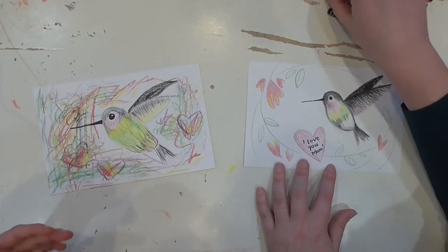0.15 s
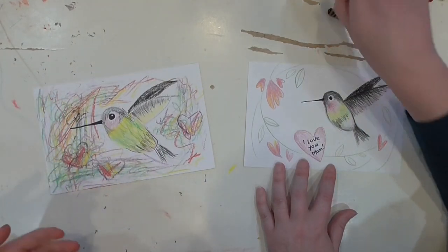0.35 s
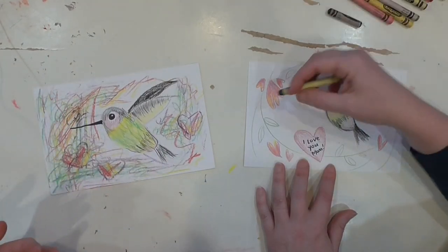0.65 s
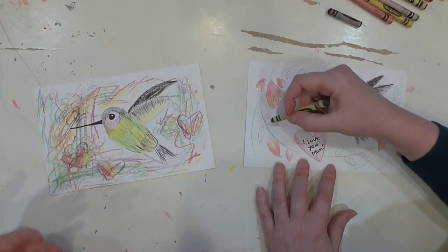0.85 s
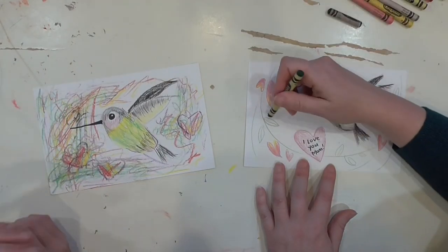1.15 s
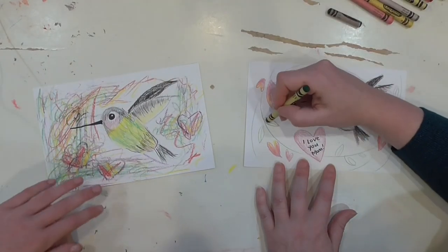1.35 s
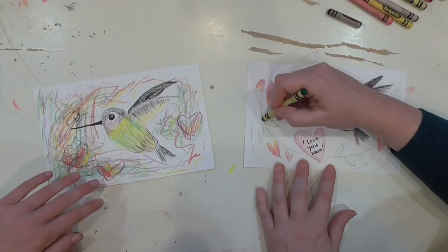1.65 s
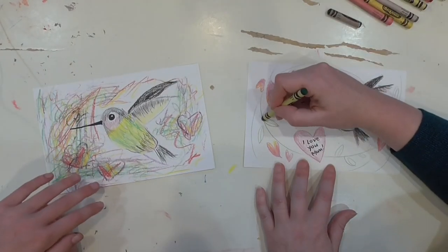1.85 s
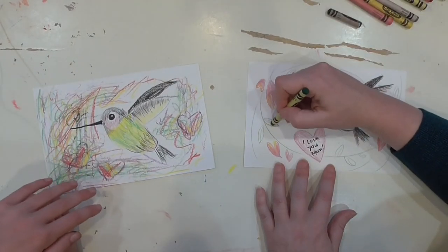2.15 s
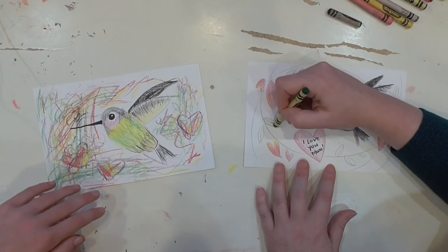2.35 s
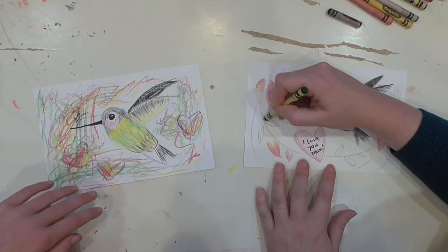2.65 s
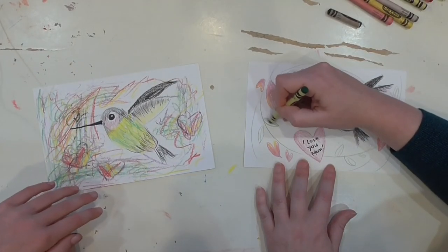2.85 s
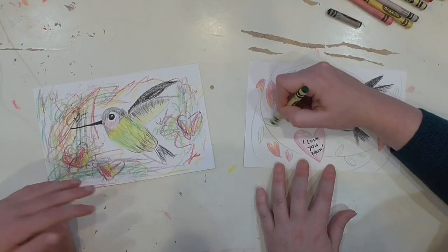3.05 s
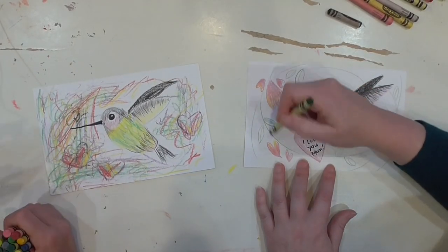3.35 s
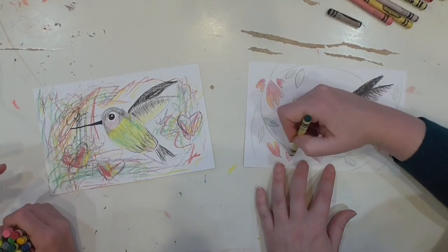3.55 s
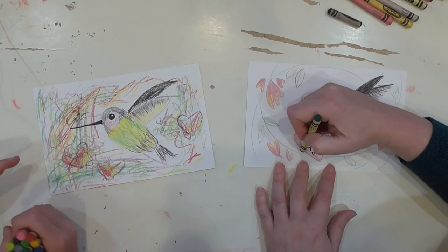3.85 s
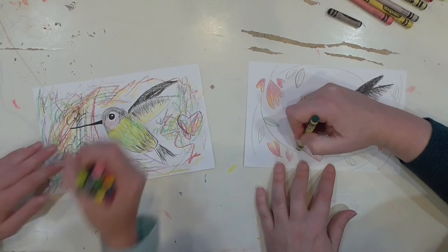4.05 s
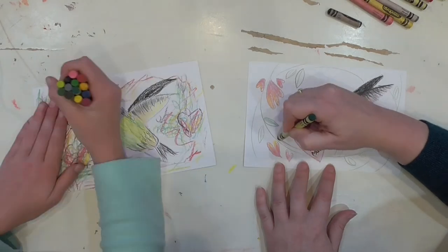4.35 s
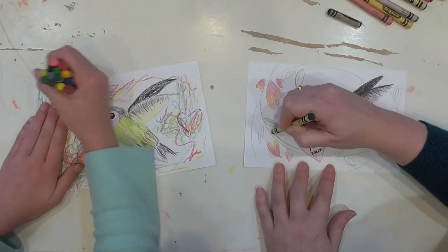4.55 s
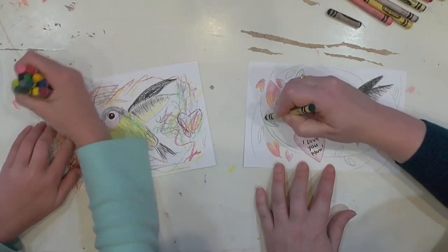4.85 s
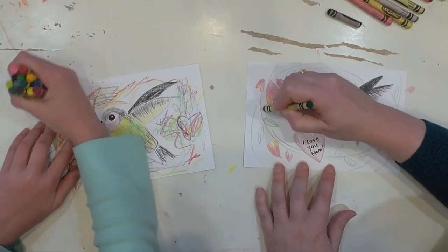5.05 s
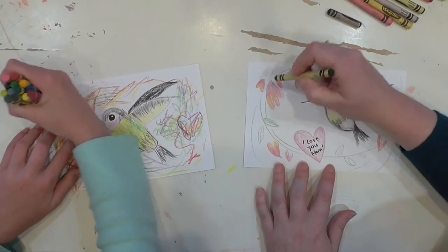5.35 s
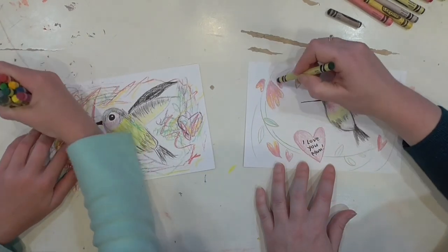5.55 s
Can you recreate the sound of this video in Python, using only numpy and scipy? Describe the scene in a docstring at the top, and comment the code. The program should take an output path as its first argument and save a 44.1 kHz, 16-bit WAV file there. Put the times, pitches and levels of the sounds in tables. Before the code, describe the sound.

Soft skin and cloth brushing over paper opens the scene, with the tail of a knock. At about one and a half seconds crayons clatter on the table top. A fast, gentle back-and-forth crayon hiss follows, then near silence. Finally a bunch of crayons hits the table and drags roughly, with low bumps and knocks. Near microphones, short room reverberation, faint background air.

```python
"""In a small room, two people draw with wax crayons on paper lying on a table.
One shades lightly back and forth; the other knocks crayons on the table, then drags a fistful over the sheet.
Stick-slip of wax on the paper's tooth is made from trains of tiny impulses, coloured as hiss.
Blows and judder excite the modes of the table top, and hands and sleeves brush softly.
Beneath lie the quiet air of the room and a brief, faint hum."""
import sys
import numpy as np
from scipy import signal
from scipy.fft import rfft, irfft, next_fast_len
from scipy.io import wavfile

SR = 44100
rng = np.random.default_rng(int(sys.argv[2]) if len(sys.argv) > 2 else 0)


def persist_wave(psi):
    """Save psi, clipped to +-1, as 16-bit WAV."""
    counts = np.round(np.clip(psi, -1, 1) * 32767).astype(np.int16)
    wavfile.write(sys.argv[1], SR, np.atleast_2d(counts).T)


N = 250929
TIME = np.arange(N) / SR   # whole scene [s]
BLOW = TIME[:SR // 2]   # time after one blow [s]


def from_db(db):
    """Level is logarithmic: 20 dB is a factor of ten in amplitude."""
    return 10 ** (np.asarray(db) / 20)


def rms_one(x):
    """Effective value: scale a signal to unit root mean square."""
    return x / np.sqrt(np.mean(x ** 2) + 1e-20)


def at_hz(points, hz, axis=1):
    """Logarithmic pitch: interpolate a column of a table on a log-frequency axis."""
    points = np.array(points)
    return np.interp(np.log(hz + 0.00079), np.log(points[:, 0]), points[:, axis])


def cut(x, hz, kind, order=2):
    """Maximally flat (Butterworth) low- or high-pass."""
    corner_hz = min(hz, SR / 2 - 2000)
    return signal.sosfilt(signal.butter(order, corner_hz, kind, fs=SR, output="sos"), x)


def resonate(x, hz, width_hz):
    """Damped resonance: a pole pair whose bandwidth sets its decay, with gain 1 on top."""
    r = np.exp(-np.pi * width_hz / SR)
    zeros = np.array([1, 0, -1]) * (1 - r * r) / 2
    poles = [1, -2 * r * np.cos(2 * np.pi * hz / SR), r * r]
    return signal.lfilter(zeros, poles, x + 1e-18)


def disperse(x, hz, width_hz):
    """Dispersion of bending waves: an allpass delays the band around hz most."""
    return x - 2 * resonate(x, hz, width_hz)


def colour(x, spectrum):
    """Spectral shaping: weight a noise by frequency and bring it to rms 1."""
    size = next_fast_len(x.shape[-1])
    hz = np.arange(size // 2 + 1) * SR / size
    shaped = irfft(rfft(x, size) * from_db(at_hz(spectrum, hz)), size)
    return rms_one(shaped[..., :x.shape[-1]])


def stereo(pair):
    """Spatial coherence: two unrelated signals become left and right, alike in the bass, apart in the treble."""
    # (frequency [Hz], left-right correlation [-1 to 1])
    likeness = [(120, 0.88), (300, 0.65), (600, 0.62), (1500, 0.45), (5000, 0.71), (9000, 0.35),
                (12000, 0.12)]
    size = next_fast_len(pair.shape[-1])
    alike = np.clip(at_hz(likeness, np.arange(size // 2 + 1) * SR / size), -1, 1)
    weighted = rfft(pair, size) * np.sqrt([1 + alike, 1 - alike])
    mid, side = irfft(weighted, size)[:, :pair.shape[-1]]
    return np.array([mid + side, mid - side])


def add(out, s, sound):
    """Superposition: mix a stereo sound in at time s."""
    at = round(s * SR)
    lo, hi = max(at, 0), min(at + sound.shape[-1], N)
    out[:, lo:hi] += sound[:, lo - at:hi - at]


def arch(middle_s, length_s, shape):
    """Speed of a movement from rest to rest: a half cosine, flatter on top for a low shape."""
    phase = np.clip((TIME - middle_s) / length_s, -.5, .5)
    return np.maximum(1e-12, np.cos(np.pi * phase)) ** shape


def slips(per_s, spread_db, clump_db, clump_rate=45):
    """Stick-slip friction: two random trains of tiny releases, in clumps as the grip changes."""
    sizes = from_db(spread_db * np.minimum(rng.exponential(1, (2, N)), 5))
    grip_db = clump_db * np.interp(TIME * clump_rate, np.arange(N), rng.standard_normal(N))
    signs = rng.choice([-1, 1], (2, N))
    released = rng.random((2, N)) < per_s / SR
    return rms_one(from_db(grip_db) * sizes * signs * released)


def table(force):
    """Modal superposition: one force drives all modes of the table top together."""
    # modes of the table top: (frequency [Hz], bandwidth [Hz], level [dB])
    mode_table = [(139.5, 21, 8), (199.5, 14, 3.5), (303.7, 68, -0.5), (419, 56, -3), (454.7, 30, -2.5),
                  (504, 37, 1), (567.7, 33, -4), (680, 50, 4), (739, 14, 0), (769, 48, 2), (848, 13, -4.5),
                  (979, 79, -0.5), (1096, 11, -1.5), (1193, 49, -1), (1307, 99, -9), (1435, 25, -2),
                  (1471, 17, -2.5), (1900, 130, -11), (2250, 280, -7.5), (2500, 9.7, -9), (2795, 61, -7),
                  (3170, 470, 0.5), (3622, 40, -28.5), (4260, 250, -15.5)]
    return sum(from_db(db) * resonate(force, hz, width) for hz, width, db in mode_table)


def contact(scatter_db, scatter_t60):
    """Impulse and reflection: one push, then bending waves scattered back from the table's edges."""
    decay = from_db(-60 * BLOW / scatter_t60)
    waves = rms_one(rng.standard_normal((2, len(BLOW))) * decay * (BLOW > .003))
    force = from_db(scatter_db) * waves / np.sqrt(len(BLOW))
    force[0, 0] += 1
    return stereo(force)


def at_level(sound, db, span_s):
    """Energy of a transient: scale a blow to the energy of db held for span_s."""
    return from_db(db) * rms_one(sound) * np.sqrt(span_s / BLOW[-1])


def room_echo():
    """Diffuse reverberation: noise builds up after the direct sound and dies band by band."""
    # reverberation: (frequency [Hz], level [dB], 60 dB decay time [s])
    echo_table = [(120, -22, 0.12), (292, -0.5, 0.38), (694, -4, 0.5), (1500, -2, 0.4), (3334, -4, 0.44),
                  (6030, -7.5, 0.33), (12000, -20.5, .22)]
    edges, out = np.geomspace(60, 16000, 13), 0
    build_up = 1 - np.exp(-(BLOW / 0.0016) ** 2)
    for low, high in zip(edges, edges[1:]):
        hz = np.sqrt(low * high)
        band_pass = signal.butter(2, [low, high], "band", fs=SR, output="sos")
        band = signal.sosfilt(band_pass, stereo(rng.standard_normal((2, len(BLOW)))))
        tail = band * from_db(-60 * BLOW / at_hz(echo_table, hz, axis=2)) * build_up
        bandwidth_gain = np.sqrt(2 * (high - low) / SR / len(BLOW))
        out = out + from_db(at_hz(echo_table, hz)) * rms_one(tail) * bandwidth_gain
    return out


def in_room(sound, wet_db=0):
    """Convolution with the room response: direct sound plus its reverberation."""
    echo = signal.fftconvolve(sound, room_echo(), axes=-1)[:, :sound.shape[-1]]
    return sound + from_db(wet_db) * echo


def crack(db, low_hz, high_hz, t60):
    """Exponential decay: a bright burst of noise that dies away."""
    # burst spectrum: (frequency [Hz], level [dB])
    click_spectrum = [(1500, 15.5), (3300, 1), (4500, 0), (6000, -11.5), (8000, -1), (10000, -0.5),
                      (12500, -10), (16000, -19)]
    noise = colour(rng.standard_normal((2, len(BLOW))), click_spectrum)
    burst = stereo(noise) * from_db(-60 * BLOW / t60)
    burst = cut(cut(burst, low_hz, "high", order=3), high_hz, "low", order=4)
    return at_level(burst, db, 0.0068)


def air():
    """Stationary background noise: the quiet air of the room."""
    # air spectrum: (frequency [Hz], level [dB])
    air_spectrum = [(25, -18), (70, -16.5), (130, -1), (230, -6), (500, -11.5), (1300, -12.5), (1800, -21),
                    (3300, -26.5), (6200, -26.5), (9500, -17.5), (12000, -18.5), (16000, -24.5)]
    return from_db(-63) * colour(stereo(rng.standard_normal((2, N))), air_spectrum)


def hum():
    """Narrow-band noise: two equal resonances in a row make a faint hum that comes and goes."""
    hz, width_hz = 232, 14   # width of each resonance
    level = from_db(-67) * arch(middle_s=4.07, length_s=0.91, shape=0.85)
    tone = resonate(rng.standard_normal(N), hz, width_hz)
    return level * rms_one(resonate(tone, hz, width_hz))


def brushing():
    """Sliding friction of skin and cloth: level follows speed, as a hiss of paper and a murmur of the table."""
    # slides of hand and sleeve: (middle [s], length [s], paper hiss [dB], table murmur [dB])
    slides = [(0.073, 0.84, -64, -68), (0.694, 0.68, -62, -65), (1.1, 0.4, -63.5, -64),
              (2.196, 0.2, -62.5, -58.5), (3.104, 0.92, -69, -66.5), (3.85, .26, -65.5, -69),
              (3.963, 0.15, -84, -62.5), (4.271, 0.46, -64, -65), (4.374, 0.11, -63, -67)]
    # hiss spectrum: (frequency [Hz], level [dB])
    paper_spectrum = [(1200, -39), (2300, -6.5), (3000, -9.5), (4700, -5), (6100, -13), (8400, 0),
                      (11000, -0.5), (14000, -9), (16000, -28)]
    # murmur spectrum: (frequency [Hz], level [dB])
    murmur_spectrum = [(40, -31), (80, -14.5), (200, -4), (380, -5.5), (600, -13), (1050, -9.5),
                       (2300, -17.5), (3500, -46)]
    hiss, murmur = 0, 0
    for s, length, hiss_db, murmur_db in slides:
        speed = arch(s, length, shape=0.87)
        hiss = hiss + from_db(hiss_db) * speed
        murmur = murmur + from_db(murmur_db) * speed
    paper = colour(stereo(slips(per_s=11000, spread_db=3, clump_db=1.2)), paper_spectrum)
    rub = colour(stereo(slips(per_s=2800, spread_db=-4.5, clump_db=0.9)), murmur_spectrum)
    return hiss * paper + murmur * rub


def shading():
    """Friction-driven resonance: slips of the tip hiss in each stroke and set crayon and sheet ringing."""
    # back-and-forth strokes: (middle [s], level [dB])
    strokes = [(1.821, -58), (1.901, -60), (2.011, -54), (2.1, -53.5), (2.2, -55), (2.305, -56),
               (2.402, -55.5), (2.515, -52), (2.616, -52), (2.733, -55.5), (2.838, -54), (2.956, -52),
               (3.038, -53.5), (3.164, -54), (3.24, -60.5)]
    # friction spectrum: (frequency [Hz], level [dB])
    friction_spectrum = [(60, -26), (150, 8), (400, 3.5), (850, -5.5), (1400, -12.5), (3000, -14.5),
                         (6200, -13.5), (8500, -2.5), (11000, -7), (13500, -9), (16000, -20.5)]
    # narrow resonances of crayon and sheet under the tip: (frequency [Hz], bandwidth [Hz], level [dB])
    tip_modes = [(1119, 81, 17), (1443, 47, 19), (2000, 84, 14.5), (11310, 300, 12.5)]
    speed = sum(from_db(db) * arch(s, length_s=0.085, shape=1.24) for s, db in strokes)
    grains = slips(per_s=12000, spread_db=2.8, clump_db=1.2)
    friction = colour(stereo(grains), friction_spectrum)
    rings = sum(from_db(db) * resonate(friction, hz, width) for hz, width, db in tip_modes)
    return speed * rms_one(friction + rings)


def ticks():
    """Transients of stiff and limp bodies: wax clicks for milliseconds; the sheet rustles a little longer."""
    # dry clicks of wax: (time [s], level [dB], lowest frequency [Hz])
    click_table = [(0.201, -59.5, 1000), (.943, -60, 4000), (1.301, -57.5, 6900), (1.4138, -48.5, 2500),
                   (1.4307, -26, 2290), (2.518, -39.5, 3000), (3.49, -67, 5100), (3.923, -61, 3000),
                   (4.4719, -38.5, 4950), (5.01, -57, 5230), (5.421, -44.5, 1480), (5.618, -30.5, 1340)]
    # short rustles of the sheet: (time [s], level [dB])
    rustle_table = [(.484, -53.5), (.533, -53.5), (.825, -56), (1.075, -60), (2.822, -49)]
    out = np.zeros((2, N))
    for s, db, low_hz in click_table:
        add(out, s, crack(db, low_hz, high_hz=5.54 * low_hz, t60=0.015))
    for s, db in rustle_table:
        add(out, s, crack(db, low_hz=7070, high_hz=13400, t60=0.14))
    return in_room(out, wet_db=2.0)


def bumps():
    """Soft contact: yielding flesh moves only the lowest modes."""
    # bumps of hands and fist: (time [s], level [dB], centre frequency [Hz])
    bump_table = [(.2, -40, 216), (0.33, -58, 230), (1.164, -63, 150), (1.713, -64, 152),
                  (1.783, -59.5, 92), (4.254, -63, 251), (4.371, -54, 210), (4.405, -61, 285),
                  (4.708, -45.5, 115), (4.863, -42.5, 103), (5.108, -35, 140), (5.34, -38, 114),
                  (5.581, -36.5, 122)]
    spread = 1.7   # a bump reaches this factor below and above its centre
    out = np.zeros((2, N))
    for s, db, hz in bump_table:
        force = contact(scatter_db=-6.5, scatter_t60=0.31)
        sound = table(force) + from_db(1.5) * resonate(force, 135, 110)
        sound = cut(sound, hz / spread, "high", order=4)
        sound = cut(sound, hz * spread, "low", order=3)
        add(out, s, in_room(at_level(disperse(sound, 150, 230), db, 0.056)))
    return out


def knocks():
    """Contact hardness: a short push at the spot, then ringing modes; harder contacts reach higher."""
    # crayons on the table: (time [s], level [dB], lowest frequency [Hz],
    # highest frequency set by contact hardness [Hz], frequency favoured at that spot [Hz])
    knock_table = [(-.07, -31.5, 345, 1900, 748), (.203, -52, 550, 1930, 775),
                   (1.415, -25.5, 420, 2000, 670), (1.4291, -24.5, 400, 4200, 1180),
                   (1.437, -24.5, 450, 1700, 1220), (1.446, -26, 300, 1000, 527),
                   (2.519, -26.5, 273, 2640, 1175), (4.033, -50.5, 80, 1146, 150),
                   (4.4742, -21.5, 125, 2250, 186), (4.712, -39.5, 152, 990, 700),
                   (4.749, -41, 250, 930, 493), (4.9813, -39, 397, 1400, 810),
                   (5.2639, -34.5, 222, 1130, 490), (5.311, -40, 347, 1070, 725),
                   (5.4186, -28, 410, 1240, 735), (5.6161, -19, 215, 1424, 765),
                   (5.644, -39, 180, 2620, 1070)]
    out = np.zeros((2, N))
    for s, db, low_hz, high_hz, spot_hz in knock_table:
        push_hz = 0.44 * high_hz
        force = contact(scatter_db=-3.5, scatter_t60=0.11)
        modes = table(force)
        modes = modes + from_db(3) * resonate(modes, spot_hz, 140)
        sound = modes + from_db(-6.5) * resonate(force, push_hz, push_hz / 2)
        sound = cut(cut(sound, low_hz, "high"), high_hz, "low", order=10)
        add(out, s, in_room(at_level(disperse(sound, 450, 280), db, 0.018)))
    return out


def fistful():
    """Stick-slip under load: many tips scrape, some snag, and their coarser judder shakes the table."""
    # pulls of the fistful: (middle [s], length [s], level at full pressure [dB])
    pulls = [(4.662, 0.19, -50), (4.81, 0.13, -52), (4.927, 0.12, -51), (5.031, 0.097, -52),
             (5.17, 0.21, -51), (5.348, 0.21, -52), (5.483, 0.14, -55.5), (5.614, 0.18, -54.5)]
    # scrape spectrum: (frequency [Hz], level [dB])
    scrape_spectrum = [(1060, -34), (1800, -3.5), (2240, 0), (2640, -11), (4170, -5), (5910, -9),
                       (7030, -6.5), (8130, -0.5), (10800, -1), (14200, -10.5), (16000, -47)]
    lean_s, lean_db_per_s = 4.694, 74   # the fist bears down harder until this time, at this rate
    snag_db, judder_db = -16, 8.5   # snags against the grains; judder against the hiss at full pressure
    pressure = from_db(lean_db_per_s * np.minimum(TIME - lean_s, 0))
    speed = sum(from_db(db) * arch(s, length, shape=0.56) for s, length, db in pulls)

    grains = slips(per_s=9000, spread_db=3.2, clump_db=1.5)
    snags = slips(per_s=70, spread_db=3, clump_db=5)   # tips that catch in the paper
    hiss = colour(stereo(grains + from_db(snag_db) * snags), scrape_spectrum)

    shake = table(stereo(slips(per_s=1100, spread_db=2.0, clump_db=3.5)))
    shake = shake + from_db(-25) * resonate(shake, 900, 300)   # this spot favours the middle modes
    shake = cut(cut(shake, 1150, "low", order=3), 63, "high")
    judder = from_db(judder_db) * rms_one(in_room(shake))
    return pressure * speed * (hiss + pressure * judder)   # judder grows faster with pressure than hiss


def scene():
    """Superposition of all sources over the quiet air of the room."""
    background = air() + hum()
    drawing = brushing() + shading() + fistful()
    return background + drawing + ticks() + bumps() + knocks()


def record(dry):
    """Band limiting: a steep elliptic low-pass removes the top."""
    low_pass = signal.ellip(10, .1, 80, 15800, fs=SR, output="sos")   # ripple, stopband [dB]; corner [Hz]
    return signal.sosfilt(low_pass, dry)


dry = scene()
out = record(dry)
persist_wave(out)
```